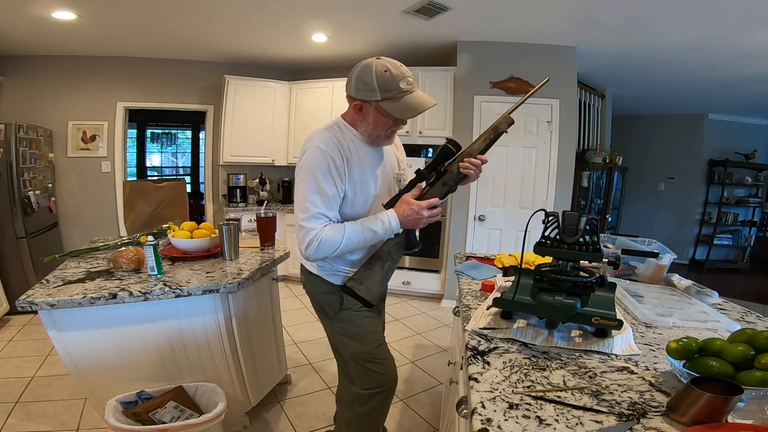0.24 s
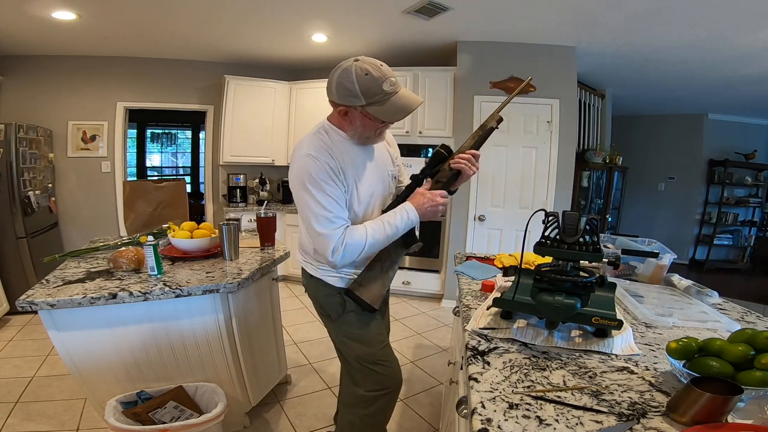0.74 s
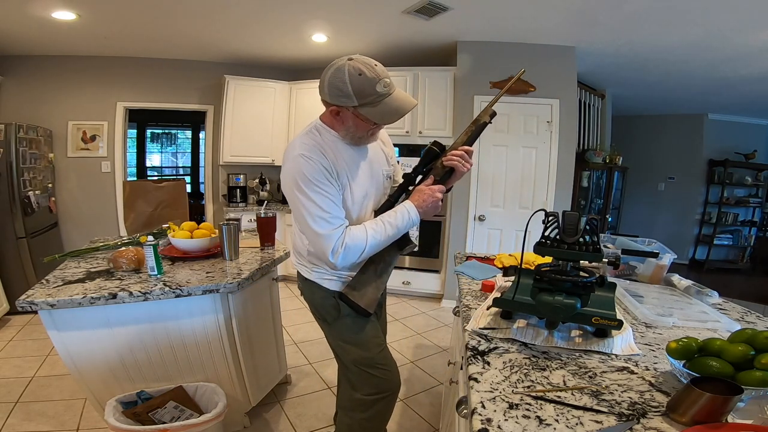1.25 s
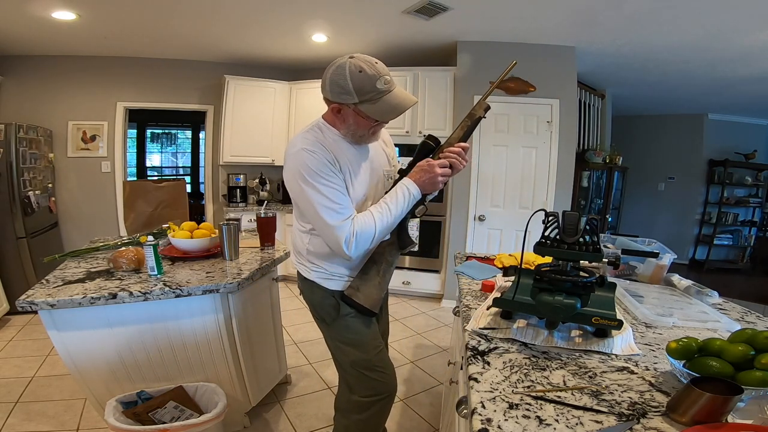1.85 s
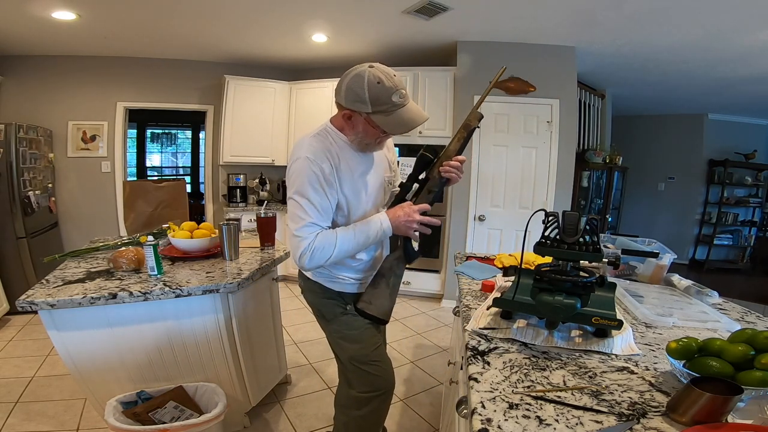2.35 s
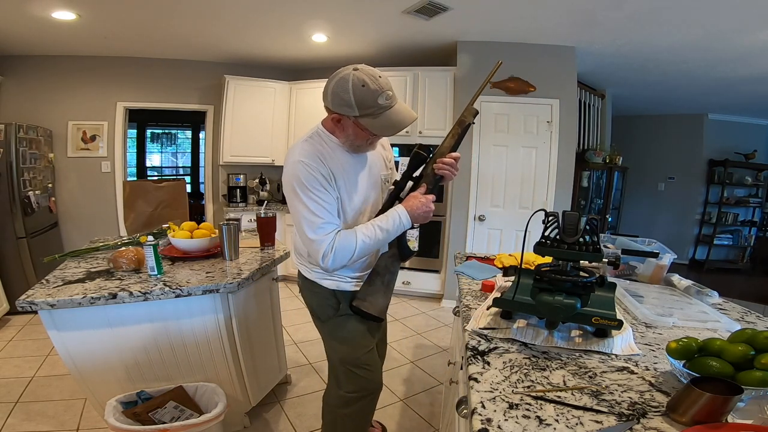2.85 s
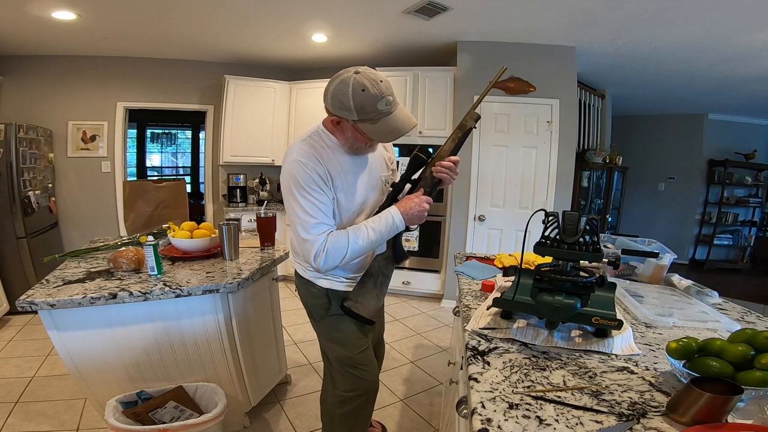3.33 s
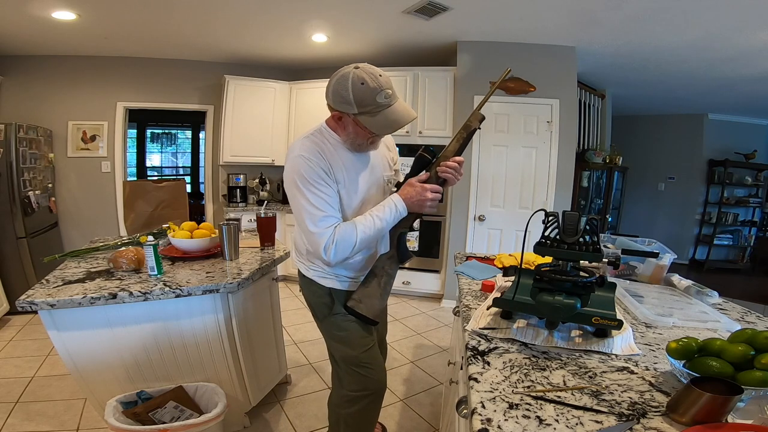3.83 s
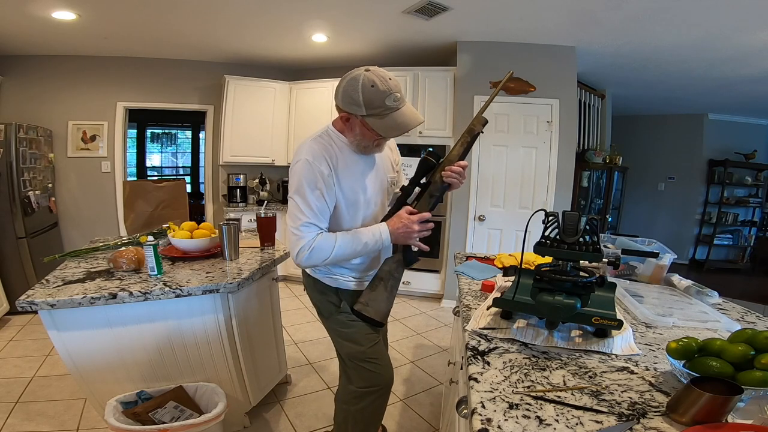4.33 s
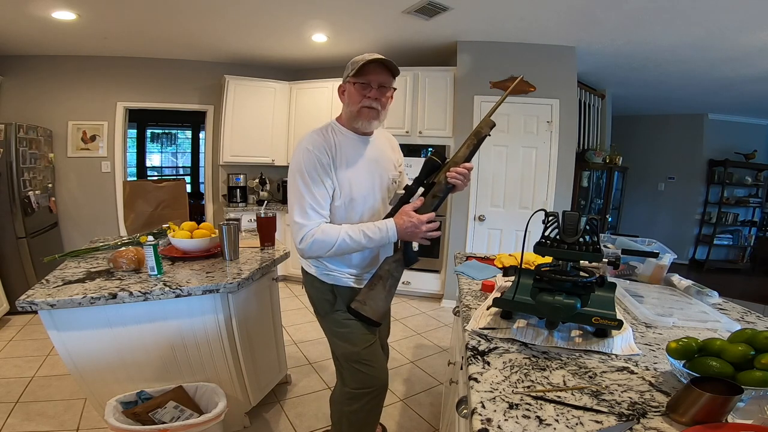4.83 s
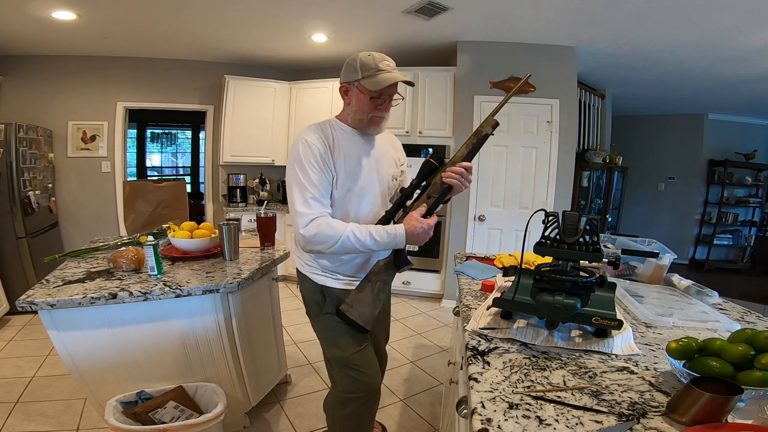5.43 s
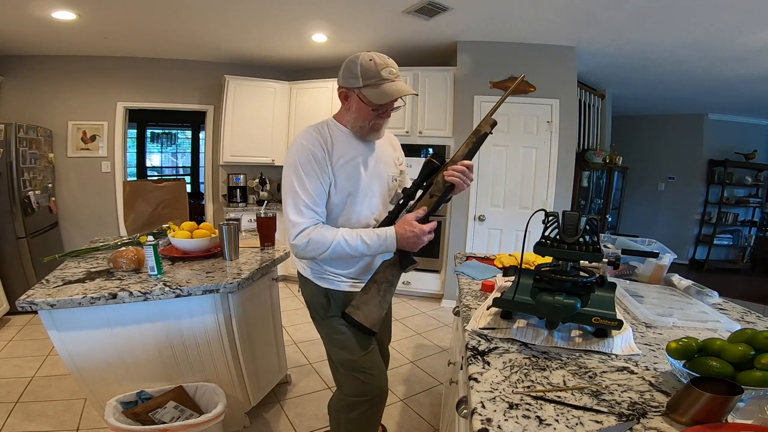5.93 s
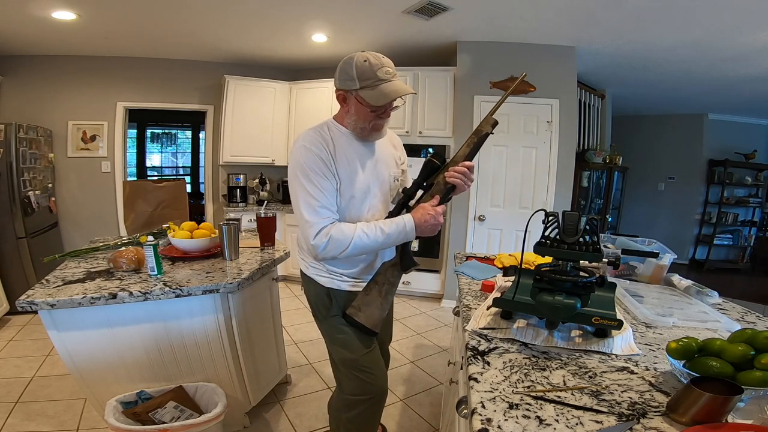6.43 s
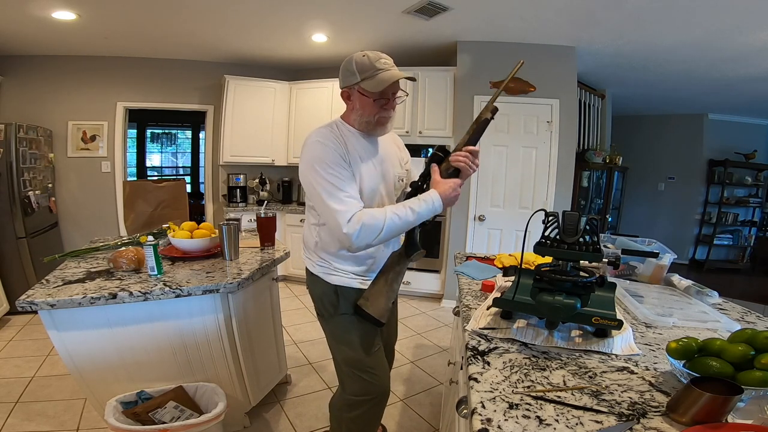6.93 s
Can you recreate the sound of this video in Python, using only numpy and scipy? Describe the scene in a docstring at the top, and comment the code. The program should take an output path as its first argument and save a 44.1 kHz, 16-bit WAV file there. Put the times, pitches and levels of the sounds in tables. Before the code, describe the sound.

Sharp metallic rifle-bolt slams, each followed by short bright room echoes, alternate with pull-back clacks over quiet ventilation and a wavering hum.

```python
"""In a hard tiled kitchen with fan air and a wavering hum, a spring-driven rifle bolt is caught open at once.
A sleeve brushes, fingers tick, and the bolt slams shut; twice more it is drawn back, caught and let slam.
Blows are short noise rattles through ringing steel and stock, clunks and thuds are dying sines, and
echoes of random sign make the room. A small camera limits the slams, pops on each, turns the bass down after
loud sound; after the second slam it narrows the stereo to nearly mono, and opens it again just before the last."""
import sys
import numpy as np
from scipy import signal
from scipy.io import wavfile
from scipy.ndimage import uniform_filter1d

SR = 44100
rng = np.random.default_rng(int(sys.argv[2]) if len(sys.argv) > 2 else 0)


def generate_wav(sig):
    """Save sig (samples, or channels by samples) to the path in sys.argv[1] as 16-bit PCM at SR."""
    pcm = np.round(np.clip(np.atleast_2d(sig).T, -1, 1) * 32767).astype(np.int16)
    wavfile.write(sys.argv[1], SR, pcm)


N = 316461  # length in samples


def gain_of(db):
    """Turns decibels into a factor."""
    return 10 ** (np.asarray(db) / 20)


def evened(x):
    """Scales a sound to an average (rms) strength of 1."""
    return x / np.sqrt(np.mean(x ** 2) + 1e-20)


def read(points, hz):
    """Reads a table of (f, value) between its points, with pitch spaced as we hear it (log axis)."""
    f, value = np.transpose(points)
    return np.interp(np.log(hz + 1), np.log(f + 1), value)


def add(mix, s, sound):
    """Mixes a sound in at time s, cutting off what runs past the end."""
    part = mix[..., round(s * SR):][..., :sound.shape[-1]]
    part += sound[..., :part.shape[-1]]


def causal(gain_db):
    """Makes a filter that rings only after its input (minimum phase) from a gain curve in dB."""
    full_circle_db = np.concatenate([gain_db, gain_db[-2:0:-1]])
    log_gain = np.log(gain_of(full_circle_db))
    spectrum = np.exp(np.conj(signal.hilbert(log_gain)))
    return np.fft.ifft(spectrum).real[:2048]


# ventilation spectrum before overall scaling: (f/Hz, level/dB per Hz)
AIR_SPECTRUM = [(12, -52), (20, -15), (92, -10), (128, -3.5), (178, -13), (302, -13.5), (484, -27),
                (865, -27), (966, -30.5), (2930, -38.5), (4500, -45.5), (6500, -46.5), (9000, -52),
                (10500, -59), (15000, -68.5)]
# how alike left and right are: (f/Hz, likeness, 1 = the same)
AIR_LIKENESS = [(60, 0.89), (300, 0.86), (700, .1), (1500, 0.081), (3000, 0.89), (4300, 0.95), (6000, .1),
                (10000, .1)]
# slow changes of the low ventilation: (t/s, level/dB)
RUMBLE_LEVEL = [(0, 0), (1.3, -2), (2.8, -1.5), (4.4, 1.5), (5.1, 7.5), (6, 3.5), (7.18, -1.5)]
# how far up those changes reach: (f/Hz, share of the dB change)
RUMBLE_SHARE = [(350, 1), (700, 0)]
AIR_DB = -51.5  # overall level


def air():
    """Ventilation from random short-time spectra with drifting patches: low rumble over a faint hiss."""
    frames, hz = N // 512 + 5, np.fft.rfftfreq(2048, 1 / SR)
    a, b, c, d, patches = rng.standard_normal((frames, 1025, 5)).T
    patches = evened(uniform_filter1d(uniform_filter1d(patches, 10, 0), 8, 1))
    same = np.clip(read(AIR_LIKENESS, hz), -1, 1)[:, None]
    left = a + 1j * b
    right = same * left + np.sqrt(1 - same ** 2) * (c + 1j * d)
    spectra = np.array([left, right])
    rumble_db = np.interp(np.arange(frames) * 512 / SR, *np.transpose(RUMBLE_LEVEL))
    spectra *= gain_of(read(RUMBLE_SHARE, hz)[:, None] * rumble_db)
    spectra *= gain_of(read(AIR_SPECTRUM, hz)[:, None] + 1.6 * patches)
    sound = signal.istft(spectra, nperseg=2048, noverlap=1536)[1][:, :N]
    return gain_of(AIR_DB) * evened(sound)


# strength of the appliance hum: (t/s, level/dB)
HUM_LEVEL = [(0, -51), (.45, -57.5), (.6, -45), (.8, -54), (1.1, -44), (1.4, -67), (2.8, -61.5), (4.9, -56),
             (5.4, -54.5), (5.8, -59.5), (6.3, -54.5), (7.18, -68.5)]
HUM_HZ, HUM_WIDTH_HZ = 123, 22.


def hum():
    """A wavering appliance hum: noise smoothed to a narrow band and shifted up to the hum's pitch."""
    t, keep = np.arange(N) / SR, np.exp(-np.pi * HUM_WIDTH_HZ / SR)
    two_smoothings = np.convolve([1, -keep], [1, -keep])
    slow = signal.lfilter([1], two_smoothings, rng.standard_normal((2, N)))
    tone = slow[0] * np.cos(2 * np.pi * HUM_HZ * t) + slow[1] * np.sin(2 * np.pi * HUM_HZ * t)
    return gain_of(np.interp(t, *np.transpose(HUM_LEVEL))) * evened(tone)


# middle of the range where stock, receiver, bolt and small parts each ring: (f/Hz)
PARTS_HZ = [550, 1400, 3400, 8000]
# the catch locks the bolt open: (t/s, clunk level/dB, steel level/dB)
CATCHES = [(.002, -18, -12.5), (2.4648, -21.5, -12), (4.427, -14.5, -16)]
# steel contacts of the catch: (t/s from the clunk, level/dB into each of the four parts, rattle t/s)
LATCHING = [(-.008, -50.5, -14.5, -36.5, -12.5, .006), (.0012, -12, -4.5, -9, -9.2, 0.0034)]
# small ticks as fingers shift on the action: (t/s, level/dB, f/Hz, fall dB per octave from f, rattle t/s)
TICKS = [(1.031, -54.5, 1500, 9, .0045), (1.359, -60, 1510, 12, 0.015), (2.131, -42.5, 1480, 10, 0.0042),
         (4.113, -46, 1700, 9.5, 0.04), (4.924, -53.5, 7940, 16.5, 0.002), (5.066, -46, 5190, 13.5, 0.033),
         (6.162, -45.5, 1420, 34.5, 0.0062), (6.999, -56, 4430, 0, 0.074), (7.069, -60, 1900, -3, 0.0074),
         (7.098, -41, 800, 18, 0.031)]
# the bolt is let go: (t/s, level/dB, brightness dB a part, grip: extra level/dB into the stock)
RELEASES = [(1.4175, 0.3, -0.03, 0.5), (3.5169, -2, -1.3, -1), (6.4467, 0.2, -0.48, -0.5)]
# when each contact of a closing stroke comes, the spring setting the pace: (t/s from the release)
CLOSING_S = [0, .0152, .02, .029, .0432, .0482, .0542]
# The catch lets go, the bolt strikes the magazine, chatters along the rails (two contacts),
# slams home and rebounds twice: (level/dB into stock, receiver, bolt, small parts, rattle t/s)
CLOSING = [(-36, -22.5, -29.5, -21.5, .017), (-22.5, -10.5, -23, -18, 0.0025),
           (-30, -24.5, -15, -25, 0.0064), (-20.5, -16.5, -16, -17, 0.013), (-17.5, -12.5, -5.5, 5, 0.0018),
           (-8, -9.5, -13, 5, 0.0027), (-7.5, -16.5, -19.5, -1, 0.0028)]
# the bolt is drawn back:
# (start t/s, stop t/s, level/dB, brightness dB a part, grip level/dB into the stock, extra level/dB at stop)
PULLS = [(2.218, 2.3287, 3.5, 1.5, -1, 0.5), (4.149, 4.2732, 0, -2, 1.45, 3.5)]
# when each contact of an opening stroke comes: (share of the travel time)
OPENING_SHARE = [0, .3, .74, .825, 1, 1.08]
# The bolt unlocks, slides back, rides over the hammer, the sear takes hold, it meets the rear stop
# and shivers: (level/dB into stock, receiver, bolt, small parts, rattle t/s)
OPENING = [(-38.5, -30.5, -41, -44, 0.016), (-44.5, -34.5, -39, -40.5, 0.078),
           (-41, -47, -42.5, -24.5, 0.014), (-35, -20.5, -27, -38, 0.0085), (-31, -18, -20, -16, .004),
           (-26.5, -31, -39, -50, 0.0089)]


def blows():
    """Lists every contact of metal and stock as (t/s, level/dB into each part, rattle t/s)."""
    part_step = np.arange(4) - 1.5  # brightness tilts the level from stock to small parts
    stock = np.eye(4)[0]
    rows = []
    for s, db, bright_db, grip_db in RELEASES:
        stroke_db = db + bright_db * part_step + grip_db * stock
        for delay, (*dbs, rattle) in zip(CLOSING_S, CLOSING):
            rows.append((s + delay, np.array(dbs) + stroke_db, rattle))
    for s, stop, db, bright_db, grip_db, stop_db in PULLS:
        stroke_db = db + bright_db * part_step + grip_db * stock
        for share, (*dbs, rattle) in zip(OPENING_SHARE, OPENING):
            contact_db = np.array(dbs) + stroke_db + stop_db * (share >= 1)
            rows.append((s + share * (stop - s), contact_db, rattle))
    for s, _, db in CATCHES:
        for lead, *dbs, rattle in LATCHING:
            rows.append((max(s + lead, 0), np.array(dbs) + db, rattle))
    for s, db, hz, fall_db, rattle in TICKS:
        octaves_away = abs(np.log2(np.divide(PARTS_HZ, hz)))
        rows.append((s, db - fall_db * octaves_away, rattle))
    return rows


# what the rifle rings with: (f/Hz, relative level/dB, time to die by 60 dB t/s, counted as .05 at most)
RINGS = [(720, 2, 0.06), (820, -0.5, 0.079), (1088, 0, 0.046), (1290, 0.5, 0.011), (1716, 0.5, 0.011),
         (2569, 3.5, 0.0092), (3130, -1.5, 0.012), (3526, 0, 0.005), (4340, -2.5, 0.0052), (4970, -4, .02),
         (6090, -9, 0.018), (6880, -7.5, 0.017), (7770, -2, .012), (8230, -2, .015), (9990, -5, 0.0033)]
CRACK_DB = -8.  # the unpitched click of each contact, against the ringing


def rifle():
    """Each blow is a dying rattle of contacts, fed to four parts that ring in overlapping ranges."""
    grit = gain_of(3.0 * np.minimum(rng.exponential(1, N), 4)) * (rng.random(N) < .4)
    grit = evened(grit * rng.standard_normal((4, N)))  # uneven, gappy noise for each part
    force, t = np.zeros((4, N)), np.arange(4096) / SR
    for s, dbs, rattle in blows():
        contacts = grit[:, round(s * SR):][:, :4096]
        rise = 1 - np.exp(-t / 0.00072)  # metal meets metal within a millisecond
        shape = np.exp(-t / max(rattle, .0005)) * rise
        add(force, s, gain_of(dbs)[:, None] * contacts * shape[:contacts.shape[1]])
    hz, out = np.fft.rfftfreq(4096, 1 / SR), np.zeros(N)
    peaks = 0
    for f, db, t60 in RINGS:  # longer ringing makes a narrower peak
        peaks = peaks + gain_of(db) ** 2 / (1 + ((hz - f) * min(t60, .05) / 1.1) ** 2)
    for part, share in zip(force, np.eye(4)):
        reach = read(list(zip(PARTS_HZ, share)), hz) + 0.00047
        body = causal(10 * np.log10(reach * (peaks + gain_of(CRACK_DB) ** 2)))
        out += signal.oaconvolve(part, body / np.linalg.norm(body))[:N]
    return out


# tones of the stock's clunk: (f/Hz, level/dB, time to die by 60 dB t/s)
HOLLOW = [(548, 0, .08), (500, -4, .07), (600, -5, .06), (1100, -8, .09), (1696, -6, .05)]
BOUNCE_S, BOUNCE_DB = .057, -7.5  # the catch rebounds once


def catches():
    """A soft-faced blow rings the hollow stock: dying sines with a soft start, then one rebound."""
    t, out = np.arange(12000) / SR, np.zeros(N)
    clunk = sum(gain_of(db - 60 * t / t60) * np.sin(2 * np.pi * f * t) for f, db, t60 in HOLLOW)
    clunk *= 1 - np.exp(-t / 0.0028)
    for s, db, _ in CATCHES:
        add(out, s, gain_of(db) * clunk)
        add(out, s + BOUNCE_S, gain_of(db + BOUNCE_DB) * clunk)
    return out


# how long the room rings: (f/Hz, time to die by 60 dB t/s)
ROOM = [(200, 0.31), (500, 0.63), (1500, 0.76), (4000, 0.66), (8000, 0.6), (13000, 0.41)]


def kitchen(x, steady):
    """Sparse reflections of random sign, each band dying at its own speed, partly other ones each side."""
    drift = evened(uniform_filter1d(rng.standard_normal(N), 90))
    out, turn = np.zeros((2, N)), np.cumsum(drift) / SR / .003
    for k in range(3):  # the contacts radiate in changing directions, so they meet three sets of walls
        taps = np.zeros((3, SR))
        at = np.arange(150, SR - 20, 20) + rng.integers(0, 20, (3, (SR - 151) // 20))
        np.put_along_axis(taps, at, rng.choice([-1., 1.], at.shape), 1)
        echoes = taps[:2] + 0.98 * taps[2]  # each side's own plus shared ones
        hz, t, z = signal.stft(echoes, SR, nperseg=256)
        dying = gain_of(-60 * t / read(ROOM, hz)[:, None])
        tail = signal.istft(z * dying, SR, nperseg=256)[1]
        facing = np.sqrt(2 / 3) * np.cos(np.pi * (turn + k / 3))
        sent = x * facing + steady / np.sqrt(3)
        out += signal.fftconvolve(sent[None], tail / np.linalg.norm(tail[0]), axes=1)[:, :N]
    return out


# sleeve and hand brushing: (t/s, length t/s, level/dB before the fade in and out, f/Hz)
BRUSHES = [(0.33, 0.24, -73.5, 6700), (0.763, 0.098, -73, 7400), (0.853, 0.1, -70.5, 4500),
           (0.874, 0.089, -70, 7960), (1.133, 0.06, -67.5, 5260), (5.85, 0.26, -79.5, 4440),
           (6.102, 0.14, -76.5, 7600), (6.19, 0.086, -72.5, 4570), (2.17, .09, -47, 1100)]


def brushes():
    """Cloth and skin rub as soft swishes of noise, each nearly an octave wide."""
    noise, out = rng.standard_normal(N), np.zeros(N)
    for s, length, db, hz in BRUSHES:
        piece = noise[round(s * SR):][:round(length * SR)]
        band_filter = signal.butter(2, [hz * 0.68, hz * 1.25], "band", fs=SR, output="sos")
        band = signal.sosfilt(band_filter, piece)
        add(out, s, gain_of(db) * evened(band) * np.hanning(len(band)))
    return out


THUD_HZ, THUD_T60_S = 306, 0.14  # pitch, and time to die by 60 dB
THUD_DB = 5.5  # dB gained per dB of grip


def thuds():
    """A short low ring of the butt each time the bolt is stopped at the rear: one dying sine."""
    t, out = np.arange(8000) / SR, np.zeros(N)
    thud = gain_of(-60 * t / THUD_T60_S) * np.sin(2 * np.pi * THUD_HZ * t)
    thud *= 1 - np.exp(-t / 0.0079)  # soft start
    for _, stop, _, _, grip_db, _ in PULLS:
        add(out, stop, gain_of(-26 + THUD_DB * grip_db) * thud)
    return out


# tone colour of the microphone: (f/Hz, level/dB)
MIC = [(100, -11.5), (350, -1), (600, -2), (2000, -2.5), (6400, 2.5), (8800, -3), (10500, -10.5),
       (11500, -17.5), (15500, -22)]
ROOM_DB = 0  # level of the room's echoes


def scene():
    """The rifle stands a little to the right; sleeve and rifle share the room."""
    near = rifle() + brushes()
    clunks = catches() + thuds()
    direct = near * gain_of([[-.7], [.7]])  # left, right in dB
    heard = direct + gain_of(ROOM_DB) * kitchen(near, .45 * clunks) + clunks
    colour = causal(read(MIC, np.fft.rfftfreq(4096, 1 / SR)))
    return signal.oaconvolve(heard, colour[None])[:, :N] + air() + hum()


def excess(x, size, over_db, recover_db_s):
    """Level above a threshold in dB: follows a rise at once, lets go at a set speed."""
    level_db = 10 * np.log10(abs(uniform_filter1d((x ** 2).mean(0), size)) + 1e-12)
    fall = np.arange(N) * recover_db_s / SR
    return np.maximum.accumulate(np.maximum(level_db - over_db, 0) + fall) - fall


def lagged(x, lag_s):
    """One-pole smoothing: follows x late."""
    keep = np.exp(-1 / (lag_s * SR))
    return signal.lfilter([1 - keep], [1, -keep], x)


# low pops as the slams overload a capsule: (t/s, length t/s, left height, right height)
POPS = [(1.4676, 0.0027, 0.66, -0.1), (1.468, .005, -0.27, 0.3), (3.5631, 0.0034, 0.59, -0.035),
        (3.566, 0.0052, 0.56, -0.29), (6.4963, 0.004, -0.69, 1)]
# the stereo width narrows, stays nearly mono, widens again: (start t/s, end t/s) of each stage
NARROWING_S = (3.73, 4.26)
MONO_S = (4.45, 5.5)
WIDENING_S = (5.6, 6.4)
NARROW_DB, MONO_DB, WIDE_DB = -17, -55, -2  # level of the left-right difference
# the camera widens the treble: (f/Hz, level/dB of the left-right difference)
SIDE_COLOUR = [(300, -2), (700, 1), (1400, 3.5), (2400, 1.5), (4400, 1.5), (8000, 7), (14000, 8.5)]
EDGE_HZ = 15750  # upper limit of the sound


def record(dry):
    """The camera: bass cut after loud sound, limiter, overload pops, stereo width, band limit."""
    bass = signal.oaconvolve(dry, signal.firwin(801, 420, fs=SR)[None], "same")
    loud_db = excess(dry, size=2000, over_db=-42.5, recover_db_s=10.5)
    bass_cut_db = 0.26 * uniform_filter1d(loud_db, 2000)
    x = dry - bass * (1 - gain_of(-bass_cut_db))
    too_loud_db = excess(x, size=100, over_db=-18.0, recover_db_s=60.5)
    x = x / gain_of(0.85 * lagged(too_loud_db, 0.0042))
    pops = np.zeros_like(x)
    for s, length, left, right in POPS:
        add(pops, s, np.outer([left, right], np.hanning(round(length * SR))))
    x = x + signal.lfilter(*signal.butter(1, 30, "high", fs=SR), pops)  # the coupling swings each pop back
    mid, side = (x[0] + x[1]) / 2, (x[0] - x[1]) / 2
    stage_times = [*NARROWING_S, *MONO_S, *WIDENING_S]
    stages_db = [0, NARROW_DB, MONO_DB, MONO_DB, NARROW_DB, WIDE_DB]
    side = side * gain_of(np.interp(np.arange(N) / SR, stage_times, stages_db))
    side_filter = causal(read(SIDE_COLOUR, np.fft.rfftfreq(4096, 1 / SR)))
    side = signal.oaconvolve(side, side_filter)[:N]
    x = np.array([mid + side, mid - side])
    low_pass = signal.firwin(511, EDGE_HZ, window=("kaiser", 9), fs=SR)
    return signal.oaconvolve(x, low_pass[None], "same")


dry = scene()
out = record(dry)
generate_wav(out)
```